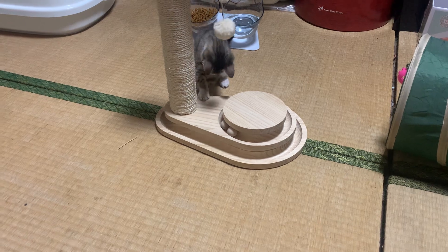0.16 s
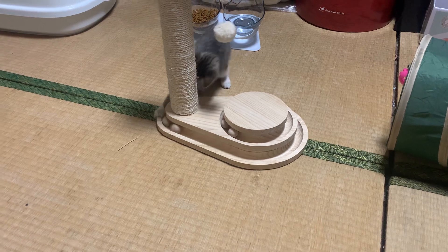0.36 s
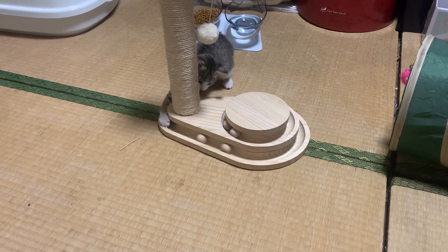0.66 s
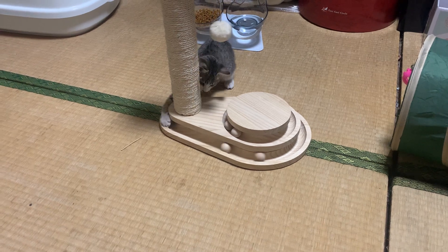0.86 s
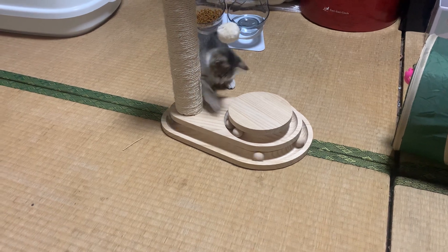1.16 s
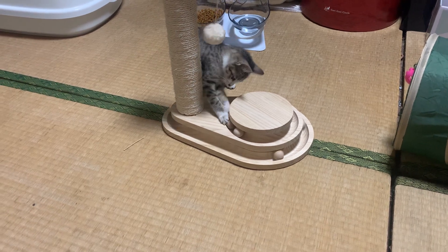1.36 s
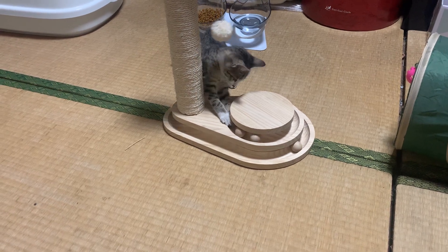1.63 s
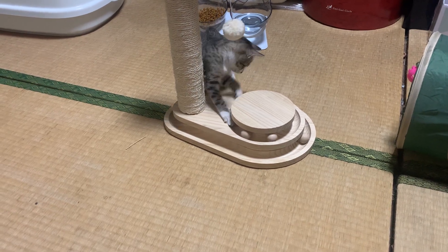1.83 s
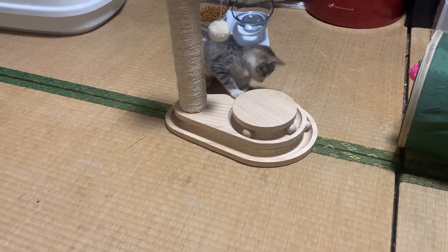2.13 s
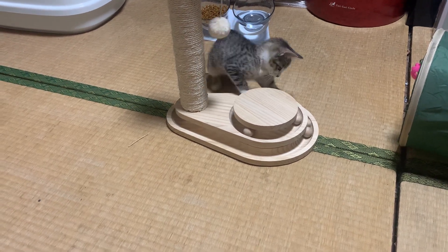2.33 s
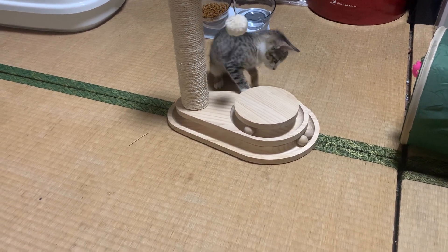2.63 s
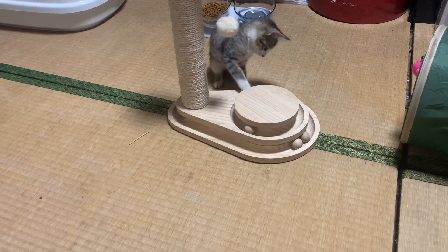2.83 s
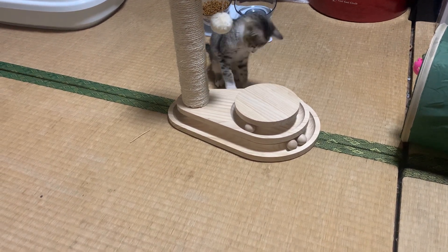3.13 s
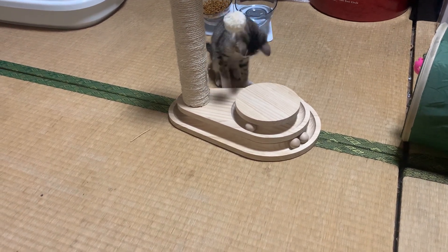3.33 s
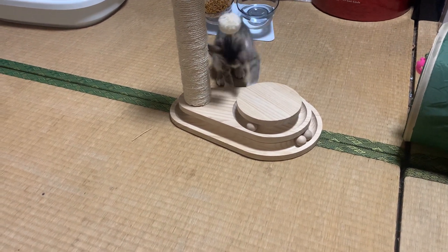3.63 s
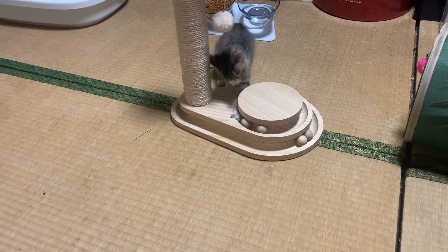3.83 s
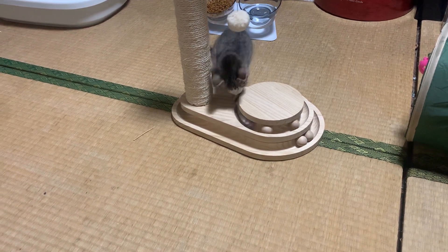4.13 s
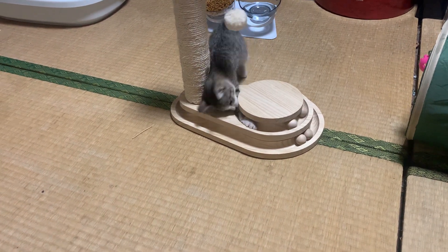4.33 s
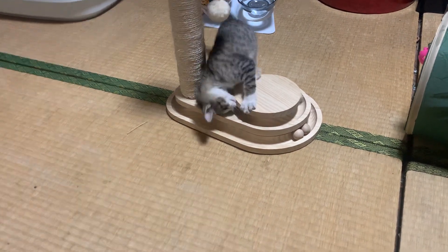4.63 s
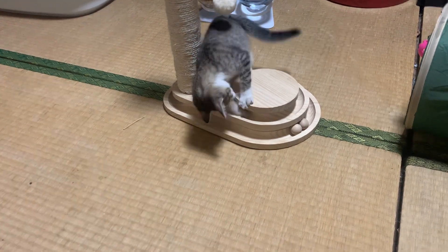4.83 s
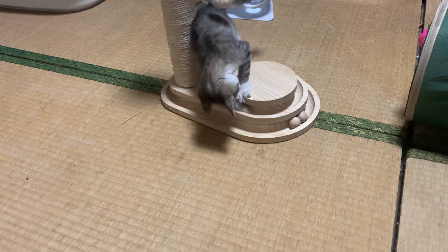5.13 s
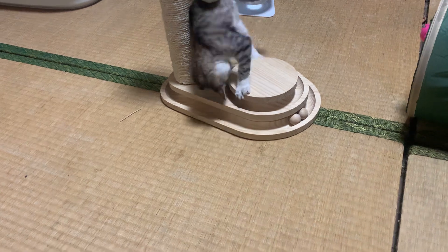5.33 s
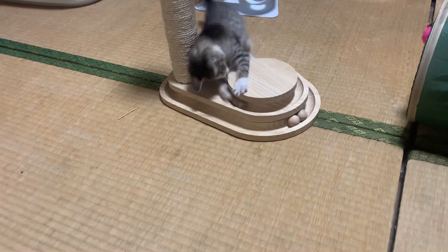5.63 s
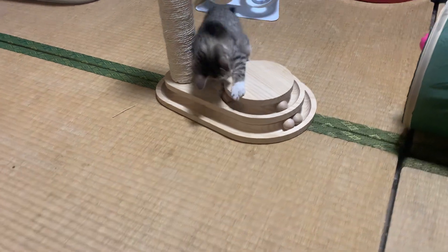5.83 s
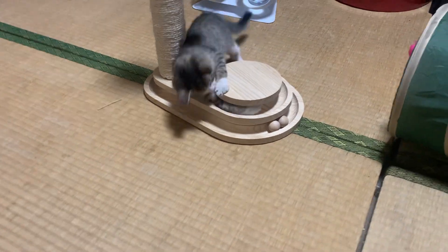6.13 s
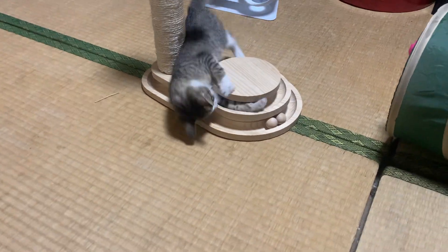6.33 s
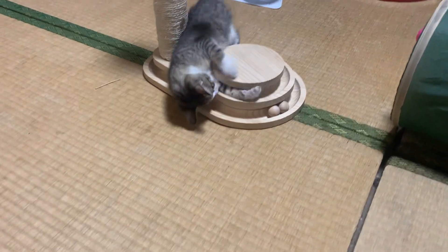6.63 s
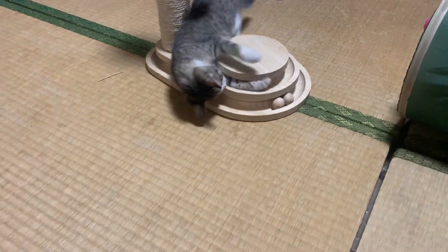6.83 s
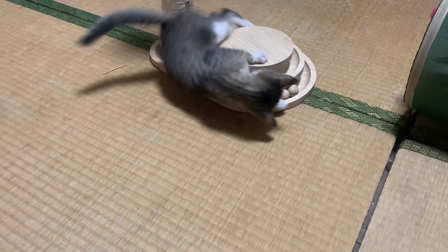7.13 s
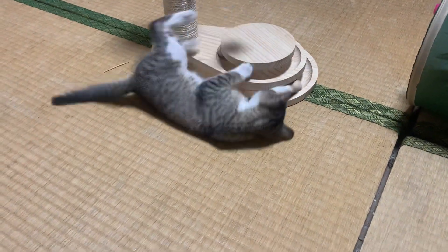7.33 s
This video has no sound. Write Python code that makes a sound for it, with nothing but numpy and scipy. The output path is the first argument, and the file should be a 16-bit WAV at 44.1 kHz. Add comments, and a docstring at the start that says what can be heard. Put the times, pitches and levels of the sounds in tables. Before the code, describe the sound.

In a small quiet room, a kitten plays with a wooden ball-track toy on a straw mat, picked up in stereo from nearby. From 0 to 1.2 s, tiny clacks, claw ticks, faint scrapes and pattering wooden knocks accompany weak rolling, with soft paw thuds at 0.3 and 0.7. It is sparser until a bright claw tick at 2.2 and low thuds at 2.4 and 3.3. At 3.8 a crisp ball clack sounds; around 4.25 several dull bumps hit the base, toward the right. After a faint stir, a hard clack at 5.5 opens the loudest burst: balls roll, rattle and knock hollowly until about 6.5, slowing as they go. Then only soft scratches, mat scuffs, a small thud at 7.2 and two faint knocks near 7.4 remain. A low wavering hum with dull rumble swells intermittently, mostly from 2.5 to 7.3, over faint room air.

```python
"""A wooden ball-track toy: each push sets balls rolling in their grooves, knocking and clacking.
A kitten plays with it and its rope-wound post on a straw mat; claws tick and scratch, paws thud.
Filtered random grains make the rolling, rubbing and scuffing; damped sines make the separate hits.
Under it lies a low hum that comes and goes, a wavering sine with a noise rumble, and faint room air."""
import sys
import numpy as np
from scipy import signal
from scipy.fft import rfft, irfft, next_fast_len
from scipy.io import wavfile
from scipy.ndimage import uniform_filter1d

SR = 44100
rng = np.random.default_rng(int(sys.argv[2]) if len(sys.argv) > 2 else 0)


def wav_out(sig):
    """Save sig, one row per channel (or a flat mono array), as 16-bit PCM at SR to the path in sys.argv[1]."""
    wavfile.write(sys.argv[1], SR, np.round(np.clip(np.atleast_2d(sig).T, -1, 1) * 32767).astype(np.int16))


N = 329515
TIME = np.arange(N) / SR
EDGE_HZ = 16200  # top of the audible band

# Event levels are relative: each source adds its own trim.
# pushes that set the balls rolling: (time [s], level [dB], fade [dB/s])
PUSHES = [(0.128, -65, 47), (0.347, -83, 86), (0.725, -81, 76), (0.98, -83, 40), (2.05, -64, 88),
          (2.49, -73.5, 85), (3.64, -61, 78), (3.73, -68, 163), (4.02, -68.5, 40), (4.19, -62, 66),
          (4.591, -71, 84), (5.12, -71, 102), (5.647, -53, 60), (5.88, -44.5, 66), (6.092, -45, 48.5)]
# one ball hits another: (time [s], level [dB], pitch [Hz])
BALL_CLACKS = [(0.1049, -43, 3500), (0.119, -50, 3370), (3.7867, -31.5, 4040), (5.2717, -53, 3250),
               (5.519, -21.5, 4020), (5.646, -25, 3900), (5.892, -27, 2980), (6.034, -43, 3270),
               (6.1, -39, 2270), (6.111, -31.5, 2100), (6.1423, -25, 4090), (6.2159, -36.5, 3000),
               (6.2756, -45, 3030), (6.4211, -25, 3110), (6.5403, -30, 3000)]
# a ball knocks on the wall of its groove: (time [s], level [dB], pitch [Hz])
WALL_KNOCKS = [(0.137, -53, 1880), (0.24, -60.5, 1730), (0.3551, -55, 1550), (0.369, -57.5, 1670),
               (0.431, -65, 1950), (0.53, -63, 2020), (0.541, -59, 2020), (0.723, -57, 1730),
               (0.761, -59, 1510), (0.771, -60.5, 1420), (0.813, -65.5, 1580), (0.94, -69, 1570),
               (1.0, -66, 1540), (1.022, -63, 1630), (1.14, -64, 1630), (1.214, -65.5, 1710),
               (1.94, -53.5, 1370), (2.0486, -51, 1780), (2.1379, -54.5, 2440), (3.6233, -58.5, 1560),
               (3.7322, -46.5, 1890), (3.756, -58.5, 1900), (3.769, -61, 2100), (4.1822, -56.5, 1170),
               (4.259, -56.5, 1900), (4.273, -60, 1950), (4.287, -59, 1820), (5.1168, -50.5, 2230),
               (5.1297, -49, 2030), (5.5199, -40, 1670), (5.5285, -52, 1880), (5.752, -43, 1300),
               (5.8631, -41.5, 1770), (5.892, -27.5, 1640), (5.902, -39, 2100), (5.919, -44.5, 1800),
               (5.943, -42.5, 890), (5.9779, -40, 1470), (5.987, -38.5, 1680), (6.0, -43.5, 1900),
               (6.009, -40.5, 1700), (6.0347, -38.5, 1680), (6.0424, -40, 1370), (6.1105, -53, 1690),
               (6.1995, -49, 940), (6.2155, -43, 1400), (6.274, -50.5, 950), (6.3476, -49, 1850),
               (6.3592, -47, 1850), (6.898, -59.5, 1300), (7.403, -59.5, 1660), (7.461, -53.5, 1980)]
# a claw catches the wood: (time [s], tick level [dB], tick pitch [Hz], snap level [dB])
CLAW_TICKS = [(0.056, -68, 9000, -55), (0.1353, -41, 13500, -52), (0.3223, -40, 11600, -64),
              (0.419, -59, 13000, -87), (0.5, -53, 11600, -84), (0.5692, -39.5, 9900, -58.5),
              (1.2132, -57, 9300, -68), (1.4514, -46.5, 9000, -47), (2.0481, -53, 9500, -52),
              (2.114, -58, 13000, -80), (2.188, -32.5, 9060, -37), (3.7922, -44.5, 12600, -61),
              (5.518, -41.5, 8200, -42), (5.891, -41, 9450, -32.5), (6.586, -57, 9200, -58)]
# strokes of claws and fur on rope, wood and straw:
# (start [s], end [s], rasp level [dB], fizz level [dB])
CLAW_STROKES = [(0.096, 0.2, -58, -88), (0.128, 0.275, -109, -62.5), (0.312, 0.392, -90, -63),
                (0.547, 0.644, -68, -69), (1.152, 1.26, -80, -76.5), (1.95, 2.022, -80, -75),
                (2.026, 2.112, -71, -64.5), (2.17, 2.268, -70, -62), (3.615, 3.695, -60.5, -82),
                (3.777, 3.829, -66.5, -56.5), (3.929, 4.09, -68.5, -88), (4.175, 4.222, -57, -84),
                (4.26, 4.326, -77, -79), (4.853, 4.918, -61, -77.5), (5.274, 5.389, -64, -76),
                (5.885, 6.003, -56.5, -85), (6.503, 6.623, -58, -100), (6.862, 6.985, -67, -90),
                (6.99, 7.105, -62, -74.5), (7.081, 7.276, -69.5, -83.5), (7.307, 7.56, -77, -76.5)]
# stretches in which the kitten shifts its feet about the toy: (start [s], end [s], level [dB])
FOOT_SHIFTS = [(0.095, 1.18, -75), (3.93, 5.536, -69), (6.84, 7.243, -72.5)]
# fur and pads drag over the mat: (start [s], end [s], level [dB])
MAT_SCUFFS = [(0.113, 0.22, -58), (6.827, 7.12, -71.5), (7.074, 7.212, -67.5), (7.193, 7.231, -59.5),
              (7.327, 7.488, -63)]
# dull bumps against the base of the toy: (time [s], level [dB], starting pitch [Hz])
BASE_BUMPS = [(1.941, -50, 795), (3.985, -48, 644), (4.237, -45, 590), (4.251, -43, 720), (4.257, -37, 904),
              (4.2625, -34.5, 507), (4.272, -40.5, 730), (4.2866, -32.5, 694), (4.609, -46, 730),
              (6.898, -59, 810), (7.205, -50, 527)]
# paws landing on the floor: (time [s], level [dB], starting pitch [Hz], swell [s])
PAW_THUDS = [(0.298, -49.5, 190, 0.024), (0.706, -39.5, 178, 0.026), (1.592, -46, 402, 0.022),
             (1.724, -45, 230, 0.025), (2.412, -43.5, 340, 0.017), (3.307, -38, 260, 0.016),
             (4.026, -39.5, 170, 0.027), (4.17, -39.5, 143, 0.017), (4.2615, -31, 820, 0.0125),
             (5.708, -44, 132, 0.032), (6.311, -44, 168, 0.018), (6.606, -40.5, 221, 0.028),
             (7.224, -45, 420, 0.017)]
# spells in which the hum comes up: (start [s], end [s], drone level [dB], rumble level [dB])
HUM_SPELLS = [(0, 0.204, -60, -57), (0.663, 1.074, -68.5, -67.5), (1.826, 1.97, -60.5, -56.5),
              (2.42, 2.528, -66, -64.5), (2.541, 2.805, -58, -57.5), (2.869, 3.812, -57.5, -58),
              (3.924, 5.533, -57, -58.5), (5.502, 7.276, -58, -64.5), (7.34, 7.49, -62, -92)]

# resonances, their widths scaled by each strike's damping: (frequency [Hz], width [Hz], level [dB])
TRACK_MODES = [(755, 35, -12), (893, 40, -3), (1085, 35, -4), (1190, 35, -6), (1370, 45, -3), (1475, 35, 0),
               (1680, 30, 2), (1870, 35, 0), (2005, 45, -4), (2150, 35, -1), (2280, 40, -1), (2570, 50, -4),
               (2740, 55, -6), (2990, 55, -7), (3400, 70, -11), (3800, 70, -13)]
BASE_MODES = [(279, 87, -6), (394, 100, -3.5), (525, 30, 5), (701, 90, 5), (819, 82, 4)]

# filter curves of the sources: (frequency [Hz], gain [dB])
GRIND_CURVE = [(300, 10.5), (650, 0.5), (900, 7), (1600, -6), (2400, -15), (3300, -22), (4800, -27),
               (7000, -21), (12000, -30.5)]
RASP_CURVE = [(500, 10), (1200, -2), (2200, 2.5), (4000, 1.5), (6000, -5.5), (9000, -9), (15000, -27)]
FIZZ_CURVE = [(4000, -64), (7200, -2), (8300, 14.5), (9800, 18.5), (14000, 11), (16000, 5.5)]
SCUFF_CURVE = [(120, -34), (220, 6.5), (480, -3), (750, 5), (1500, 0), (2500, -5), (5000, -16)]
RUMBLE_CURVE = [(40, -11), (110, -3), (170, -14), (220, 2.5), (280, -2), (350, -7.5), (560, -10),
                (800, -15.5), (1050, -20), (1600, -33), (2100, -35), (3000, -80)]
# still air of the room: (frequency [Hz], gain [dB])
AIR_CURVE = [(20, -9.5), (45, 22.5), (70, 18), (160, -21), (230, 3), (320, -4), (570, 13), (900, -5.5),
             (1700, -3.5), (2800, -13.5), (6000, -17), (9500, -10.5), (15000, -16.5)]
# treble dips of the microphone: (frequency [Hz], gain [dB])
MIC_CURVE = [(6800, 0.5), (7500, -6), (8300, 0), (10800, -4.5), (11500, -29), (12000, -14), (12700, 0),
             (14800, -2), (15800, -16.5)]
# time the room's tail takes to fall 60 dB: (frequency [Hz], decay time [s])
TAIL_DECAY = [(200, 0.047), (800, 0.27), (2000, 0.24), (4000, 0.25), (9000, 0.24), (15000, 0.018)]
# where the hits come from: (time [s], left over right [dB])
HIT_SIDE = [(0, 1.5), (2.3, 0), (3.8, -16.5), (5.5, -5.5), (6.6, -1)]
# the bass is central below this edge: (time [s], edge [Hz])
CENTRAL_BASS = [(0, 1100), (4.1, 884), (5.0, 432), (5.6, 270), (6.4, 110), (7.2, 46)]


def rolling(roll_db=1.5, hop_db=-2, grind_db=-4.5, ring_db=-1, spot_width_hz=520, lean_db=-0.2, count=8):
    """Balls grind along the grooves and hop; each spot they land on rings the tracks differently."""
    t = np.arange(SR // 8) / SR
    hops = np.zeros((2, N))
    for spot_hz in np.geomspace(950, 2500, count):
        tracks = np.array([ring(TRACK_MODES, t, damping=0.55) for _ in range(2)])
        tap = ping(t, spot_hz, spot_width_hz) + amp(ring_db) * tracks
        landings = grains(per_s=28, spread_db=2.3)
        hops += signal.oaconvolve(landings[None], tap, axes=1)[:, :N]
    grind = unit(colour(grains(2300, spread_db=-6.0), GRIND_CURVE))
    balls = radiate(circling(amp(hop_db) * unit(hops) + amp(grind_db) * grind))
    return amp(roll_db) * coasting() * balls * amp([[lean_db], [-lean_db]])


def coasting(rise_s=0.0025):
    """Gain of the rolling: each push brings it up quickly, then friction makes it die away."""
    power, t = np.zeros(N), np.arange(2 * SR) / SR
    for s, db, fade in PUSHES:
        push = amp(db - fade * t) * np.minimum(t / rise_s, 1)
        add(power, s, push ** 2)
    return np.sqrt(power)


def circling(x, path_s=0.00156, growth_s_per_s=0.0017):
    """After each push a ball leaves the rim; echoes come ever later, so the resonances slide down."""
    echo = 0.4
    age = np.zeros(N)  # time since the latest push
    for s, _, _ in PUSHES:
        age = np.where(TIME > s, TIME - s, age)
    delay = path_s + growth_s_per_s * age
    out = np.zeros((2, N))
    for k in range(3):
        delayed = np.array([np.interp(TIME - k * delay, TIME, ear) for ear in x])
        out += (-echo) ** k * delayed
    return out * np.sqrt(1 - echo ** 2)  # offsets the energy the echoes add


def rattle(chatter_db=-14, chatter_hz=4000, chatter_width_hz=2600, chatter_per_s=110):
    """Rolling balls chatter lightly against each other: random pings under the rolling gain."""
    touches = grains(chatter_per_s, spread_db=6.5)
    touch = ping(at_ears(), chatter_hz, chatter_width_hz)
    chatter = signal.oaconvolve(touches[None], touch, axes=1)[:, :N]
    return coasting() * amp(chatter_db) * unit(radiate(chatter))


def clacks(clack_db=7.5, clack_width_hz=1150, overtone=1.38, overtone_db=-12.5,
           crack_db=-1.5, crack_ratio=0.82, crack_width_hz=2400,
           beam_db=-20, rim_db=-15, rim_s=0.0014, tracks_db=-22):
    """Ball on ball: a beamed clack inside a broad crack; the rim throws it back, the tracks ring on."""
    (direct, scattered), t = np.zeros((2, 2, N)), at_ears()
    paths = rng.uniform(0.35, 1.5, len(BALL_CLACKS))  # relative distances by way of the rim
    for (s, db, hz), path in zip(BALL_CLACKS, paths):
        clack = ping(t, hz, clack_width_hz)
        upper = amp(overtone_db) * ping(t, overtone * hz, overtone * clack_width_hz)
        tone = amp(db + clack_db) * (clack + upper)
        crack = amp(db + crack_db) * ping(t, crack_ratio * hz, crack_width_hz)
        tracks = np.array([ring(TRACK_MODES, ear.clip(0), damping=0.5) for ear in t])
        add(direct, s, spread(s, tone + crack))
        add(direct, s + path * rim_s, amp(rim_db) * spread(s, tone))
        add(direct, s, amp(db + tracks_db) * tracks)
        add(scattered, s, amp(beam_db) * tone + crack)  # little of the beamed tone fills the room
    return radiate(direct + room(scattered, tail_db=1.0, early_db=2.5), edge_hz=1300)


def knocks(body_db=9.0, tracks_db=-8, body_width_hz=900, rim_db=-2, rim_ratio=1.27, rim_width_hz=1400,
           click_db=-4, click_hz=3700, click_width_hz=2600,
           soft_db=-60, soft_edge_hz=2400, db_per_octave=18):
    """Ball on wood: a click and a hollow knock ring the tracks; a harder blow is briefer, so brighter."""
    direct, t = np.zeros((2, N)), at_ears()
    for s, db, hz in WALL_KNOCKS:
        body = ping(t, hz, body_width_hz) + amp(tracks_db) * ring(TRACK_MODES, t[0], damping=0.87)
        rim = amp(rim_db) * ping(t, rim_ratio * hz, rim_width_hz)
        click = amp(click_db) * ping(t, click_hz, click_width_hz)
        knock = amp(body_db) * body + rim + click
        edge_hz = min(soft_edge_hz * 2 ** (max(db - soft_db, 0) / db_per_octave), SR / 4)
        lowpass = signal.butter(4, edge_hz, fs=SR, output="sos")
        add(direct, s, amp(db) * spread(s, signal.sosfilt(lowpass, knock)))
    return radiate(direct + room(direct, tail_db=-5.5, early_db=-1.0))


def ticks(tick_db=8, tick_width_hz=2200, snap_db=6, snap_hz=3700, snap_width_hz=2300):
    """Claw on wood, straight ahead: a bright tick with a small snap of the wood under it."""
    (edge, wood), t = np.zeros((2, 1, N)), np.arange(SR // 8) / SR
    for s, tick, hz, snap in CLAW_TICKS:
        add(edge, s, amp(tick + tick_db) * ping(t, hz, tick_width_hz))
        add(wood, s, amp(snap + snap_db) * ping(t, snap_hz, snap_width_hz))
    edge_echoes = room(edge, tail_db=-13, early_db=-6)[:1]  # one channel keeps the tick central
    wood_echoes = room(wood, tail_db=-3.5, early_db=3.5)
    return radiate(edge + edge_echoes + wood + wood_echoes)


def rubbing(rasp_db=2, fizz_db=4.5, bite_s=0.019, release_s=0.031, fade_db=-6,
            catch_db=2.5, fizz_width=0.93):
    """Strokes bite quickly and ease off; snagging fibres let go in a dry rasp with a fine fizz above."""
    rasp_gain, fizz_gain = np.zeros((2, N))
    for start, end, rasp, fizz in CLAW_STROKES:
        t = np.arange(0, max(end - start, bite_s), 1 / SR)
        bite, release = np.minimum(t / bite_s, 1), np.minimum(t[::-1] / release_s, 1)
        stroke = bite * release * amp(fade_db * t / t[-1])
        add(rasp_gain, start, amp(rasp + rasp_db) * stroke)
        add(fizz_gain, start, amp(fizz + fizz_db) * stroke)
    snags = np.array([grains(3000, spread_db=6.0) for _ in range(2)])
    # the paw grips unevenly
    catch = amp(catch_db * unit(uniform_filter1d(rng.standard_normal(N), size=600)))
    rasping = unit(colour(snags, RASP_CURVE))
    fizzing = unit(colour(snags[0] + fizz_width * snags[::-1], FIZZ_CURVE))
    return catch * (rasp_gain * rasping + fizz_gain * fizzing)


def patter(wood_db=-5.0, taps_per_s=14, soft_hz=2000, count=4):
    """While the kitten fidgets, soft pads nudge the tracks and keep the balls faintly stirring."""
    (gain, wood), t = np.zeros((2, N)), np.arange(SR // 8) / SR
    for start, end, db in FOOT_SHIFTS:
        gain += amp(db) * (TIME > start) * (TIME < end)
    for _ in range(count):
        taps = grains(taps_per_s, spread_db=2.0)
        wood += signal.oaconvolve(taps, ring(TRACK_MODES, t, damping=0.86))[:N]
    touches = uniform_filter1d(gain, size=2000) * amp(wood_db) * unit(wood)
    return signal.sosfilt(signal.butter(4, soft_hz, fs=SR, output="sos"), touches)


def scuffs(scuff_db=-2, taper=0.92, ribs_per_s=600):
    """The kitten's body drags over the ribs of the mat in short, dull, grainy sweeps."""
    gain = np.zeros(N)
    for start, end, db in MAT_SCUFFS:
        sweep = signal.windows.tukey(max(round((end - start) * SR), 2), taper)
        add(gain, start, amp(db + scuff_db) * sweep)
    mid, side = [grains(ribs_per_s, spread_db=-7.0) for _ in range(2)]
    return gain * unit(colour(np.array([mid + .5 * side, mid - .5 * side]), SCUFF_CURVE))


def bumps(bump_db=0, swell_s=0.0029, fall_s=0.034, base_db=-7):
    """The kitten's soft weight rocks the base on the mat: a falling note over the ring of the base."""
    out, t = np.zeros(N), np.arange(SR // 8) / SR
    swell = (t / swell_s * np.exp(1 - t / swell_s)) ** 2
    for s, db, start_hz in BASE_BUMPS:
        hz = start_hz * np.exp(-t / fall_s)
        bend = swell * np.sin(2 * np.pi * np.cumsum(hz) / SR)
        base = ring(BASE_MODES, t, damping=0.33) * (1 - np.exp(-t / swell_s))
        add(out, s, amp(db + bump_db) * (bend + amp(base_db) * base))
    return out


def thuds(thud_db=0, floor_hz=58, fall_share=0.362, pad_db=-19, pad_s=0.054):
    """A soft pad lands; the floor's higher notes arrive first, so pitch falls, faster if quick."""
    out, t = np.zeros(N), np.arange(SR // 4) / SR
    lowpass = signal.butter(3, 330, fs=SR, output="sos")
    for s, db, start_hz, swell_s in PAW_THUDS:
        hz = floor_hz + (start_hz - floor_hz) * np.exp(-t / (fall_share * swell_s))
        swell = (t / swell_s * np.exp(1 - t / swell_s)) ** 2
        bend = swell * np.sin(2 * np.pi * np.cumsum(hz) / SR)
        pad = unit(signal.sosfilt(lowpass, rng.standard_normal(len(t)))) * np.exp(-t / pad_s)
        add(out, s, amp(db + thud_db) * (bend + amp(pad_db) * pad))
    return out


def hum(hum_hz=58.84, drone_db=3.5, rumble_db=-1.5, waver=0.98, side_db=-4):
    """A low sine wavers under added bass noise, with a dull, steady rumble spread around it."""
    drone, rumble = spells()
    flutter_curve = [(15, -16.5), (40, -4.5), (60, -1.5), (100, -0.5), (165, -9.0),
                     (230, -12.5), (310, -52.5), (900, -80.5)]  # (frequency [Hz], gain [dB])
    flutter = unit(colour(rng.standard_normal(N), flutter_curve))
    tone = unit(unit(np.sin(2 * np.pi * hum_hz * TIME)) + waver * flutter)
    mid, side = unit(colour(rng.standard_normal((2, N)), RUMBLE_CURVE))
    wash = np.array([mid + amp(side_db) * side, mid - amp(side_db) * side])
    return amp(drone_db) * drone * tone + amp(rumble_db) * rumble * wash


def spells(rest_drone_db=-74, rest_rumble_db=-77, ramp_s=0.027):
    """Gains of drone and rumble before trim: low at rest, ramped to a steady level for each spell."""
    drone, rumble = amp(rest_drone_db), amp(rest_rumble_db)
    drones, rumbles = np.full(N, drone), np.full(N, rumble)
    for start, end, drone_db, rumble_db in HUM_SPELLS:
        up = np.clip(np.minimum(TIME - start, end - TIME) / ramp_s + .5, 0, 1)
        drones += up * (amp(drone_db) - drone)
        rumbles += up * (amp(rumble_db) - rumble)
    return drones, rumbles


def air(air_db=-70, side_db=-4):
    """Faint steady room noise as filtered mid and side noise, the side with its own colour."""
    mid, side = colour(rng.standard_normal((2, N)), AIR_CURVE)
    side = amp(side_db) * colour(side, [(100, 11.0), (300, 5), (1200, -0.5), (3000, 4.0)])
    return amp(air_db) * np.array([mid + side, mid - side]) / np.std(mid)


def room(x, tail_db, early_db, early_s=0.0032, gap_s=0.0068):
    """The echoes alone: quick scatter off the toy and floor, then the short tail of a small room."""
    t = np.arange(SR // 2) / SR
    taps = rng.choice([-1., 1.], (2, len(t))) * (rng.random((2, len(t))) < 3000 / SR)
    early = taps * np.exp(-t / early_s) * (t > .0008)
    hz, age, z = signal.stft(taps[:, ::-1] * (t > gap_s), SR, nperseg=256)
    decay = amp(-60 * age / read(TAIL_DECAY, hz)[:, None])
    tail = signal.istft(z * decay, SR, nperseg=256)[1][:, :len(t)]
    response = (amp(early_db) * unit(early) + amp(tail_db) * unit(tail)) / np.sqrt(len(t))
    return signal.fftconvolve(x, response, axes=1)[:, :N]


def radiate(x, edge_hz=760):
    """Small wooden parts give off almost no bass: a steep highpass."""
    return signal.sosfilt(signal.butter(7, edge_hz, "highpass", fs=SR, output="sos"), x)


def spread(s, sound):
    """Leans a hit to the side of the toy where the kitten is playing."""
    pan = np.interp(s, *np.transpose(HIT_SIDE))
    return sound * amp(np.array([[pan], [-pan]]) / 2)


def at_ears(lead_s=.00006):
    """Time since a hit at each ear: the left one hears it first."""
    return np.arange(SR // 8) / SR - np.array([[0], [lead_s]])


def ping(t, hz, width_hz):
    """A heavily damped sine whose envelope swells to 1, sooner for a wider resonance, then decays."""
    u = np.pi * width_hz * np.maximum(t, 0)
    return u * np.exp(1 - u) * np.sin(2 * np.pi * hz * t)


def ring(modes, t, damping, least_share=0.12):
    """A struck body, peak 1; each blow meets the modes with its own signs and strengths."""
    hz, width, db = np.transpose(modes)[:, :, None]
    share = rng.choice([-1, 1], hz.shape) * rng.uniform(least_share, 1, hz.shape)
    decay = np.exp(-np.pi * width * damping * t)
    sound = (share * amp(db) * width * decay * np.sin(2 * np.pi * hz * t)).sum(0)
    return sound / abs(sound).max()


def grains(per_s, spread_db):
    """Random impulses of either sign; positive spread makes a few strong, negative a few weak."""
    size = amp(spread_db * np.minimum(rng.exponential(1, N), 3))
    return size * rng.choice([-1, 1], N) * (rng.random(N) < per_s / SR)


def amp(db):
    """Decibels to gain."""
    return 10 ** (np.asarray(db) / 20)


def unit(x):
    """Scales to rms 1, over all channels together."""
    return x / np.sqrt(np.mean(x ** 2) + 1e-20)


def read(points, hz):
    """Reads a frequency table on a log-frequency axis."""
    f, value = np.transpose(points)
    return np.interp(np.log(hz + 1), np.log(f), value)


def colour(x, points):
    """Filters by a gain curve."""
    size = next_fast_len(N + 4096)
    gain = amp(read(points, np.fft.rfftfreq(size, 1 / SR)))
    return irfft(rfft(x, size) * gain, size)[..., :N]


def add(mix, s, sound):
    """Mixes a sound in at time s."""
    part = mix[..., max(round(s * SR), 0):][..., :sound.shape[-1]]
    part += sound[..., :part.shape[-1]]


def narrow(x, order=10):
    """Folds the bass to the centre; the edge sinks, mostly late on, so the low end opens out."""
    hz, t, z = signal.stft((x[0] - x[1]) / 2, SR, nperseg=1024, noverlap=768)
    edge_hz = np.interp(t, *np.transpose(CENTRAL_BASS))
    kept = z / (1 + (edge_hz / (hz[:, None] + 1)) ** order)
    side = signal.istft(kept, SR, nperseg=1024, noverlap=768)[1][:N]
    return x.mean(0) + np.array([side, -side])


def scene():
    """The toy and claws sound through the room; the floor, the hum and the air lie under them."""
    play = rolling() + rattle() + rubbing() + scuffs() + patter()
    hits = clacks() + knocks() + ticks()  # these carry their own echoes
    echoes = room(play, tail_db=-9.0, early_db=-1.5)
    return hits + play + echoes + bumps() + thuds() + hum() + air()


def record(dry):
    """Central bass and microphone colour, then the band limit."""
    coloured = colour(narrow(dry), MIC_CURVE)
    band = signal.firwin(511, EDGE_HZ, window=("kaiser", 9), fs=SR)
    return signal.oaconvolve(coloured, band[None], "same", axes=1)


dry = scene()
out = record(dry)
wav_out(out)
```